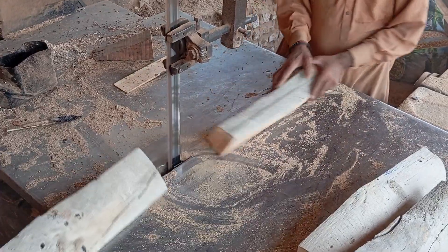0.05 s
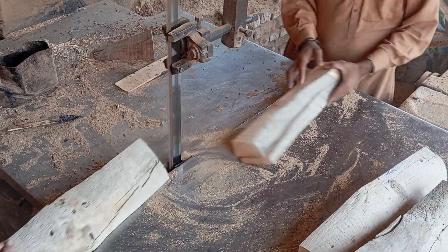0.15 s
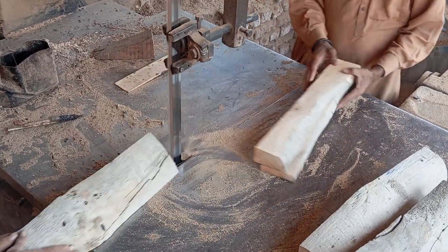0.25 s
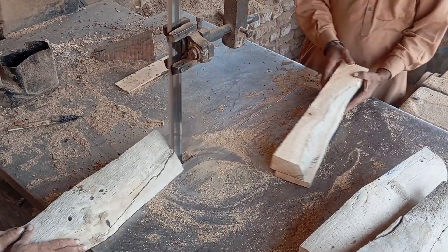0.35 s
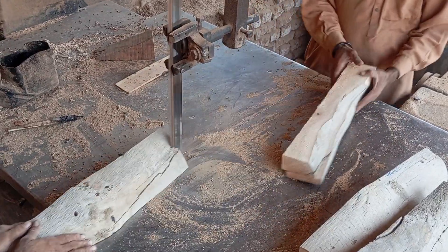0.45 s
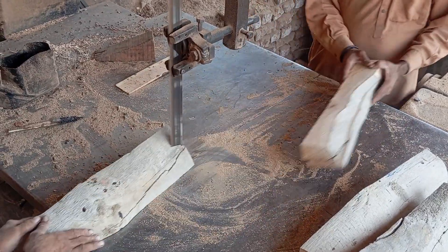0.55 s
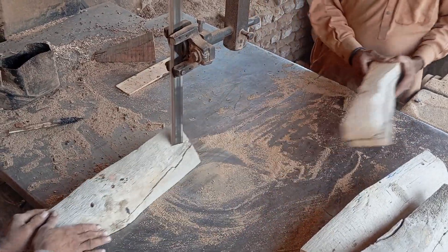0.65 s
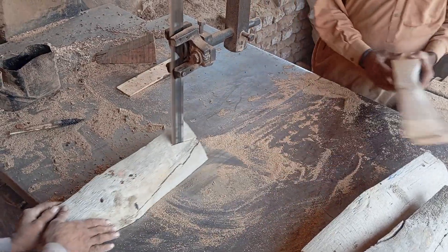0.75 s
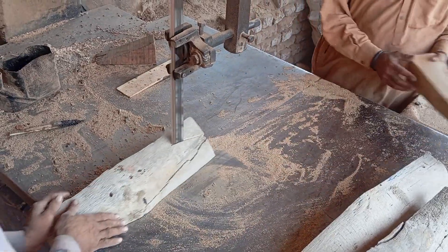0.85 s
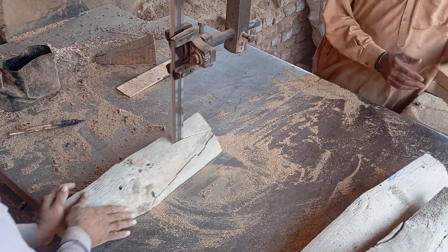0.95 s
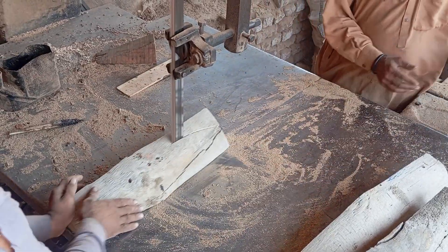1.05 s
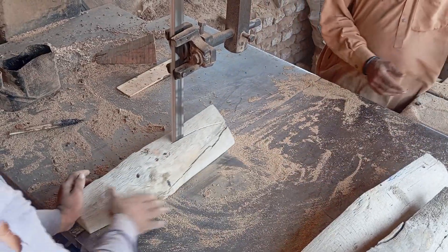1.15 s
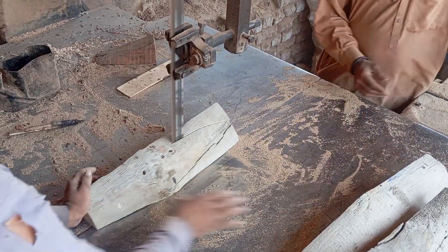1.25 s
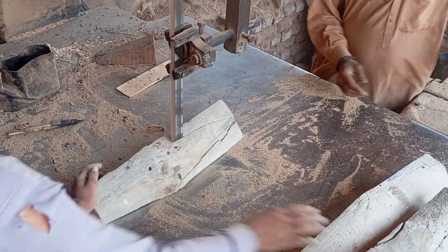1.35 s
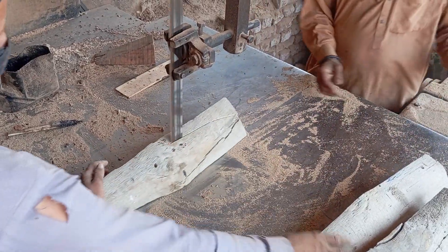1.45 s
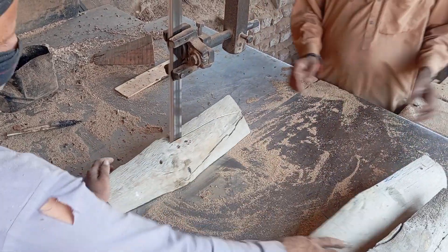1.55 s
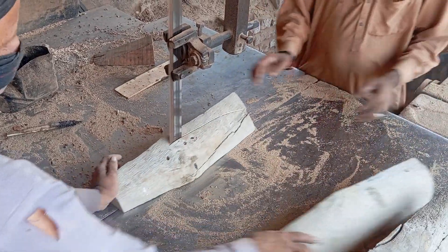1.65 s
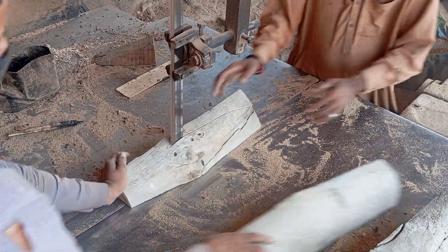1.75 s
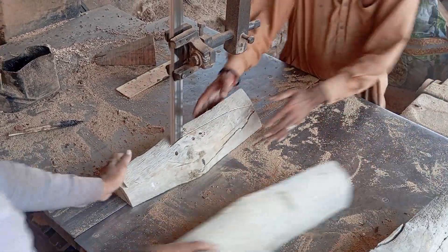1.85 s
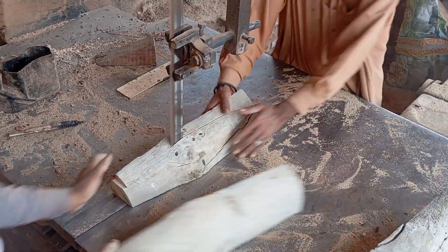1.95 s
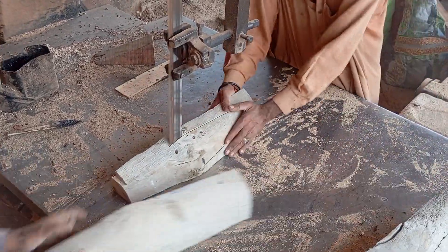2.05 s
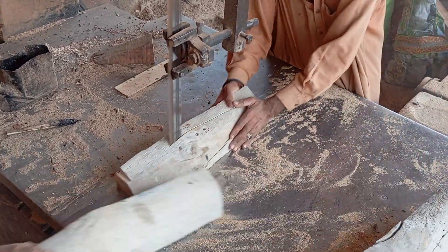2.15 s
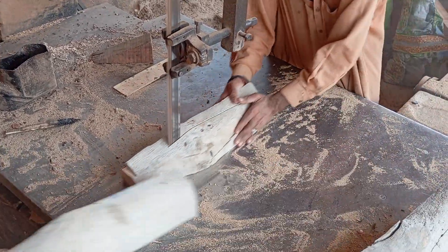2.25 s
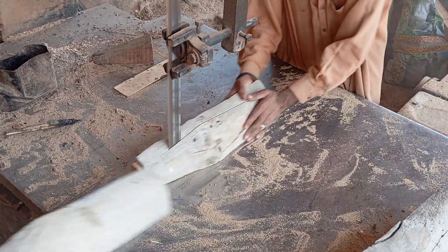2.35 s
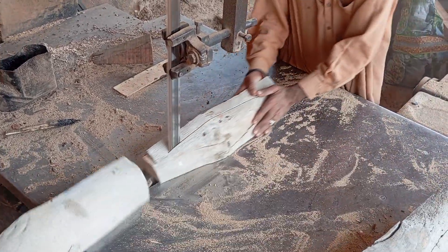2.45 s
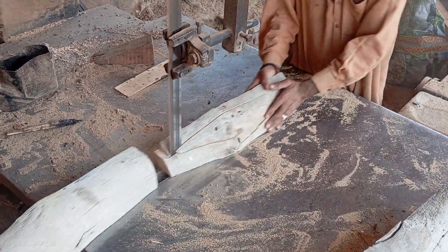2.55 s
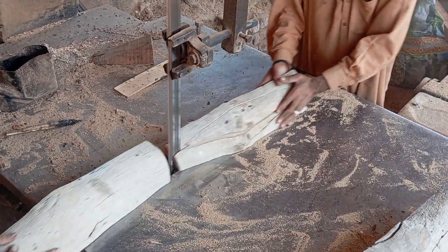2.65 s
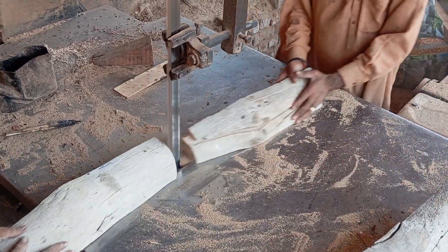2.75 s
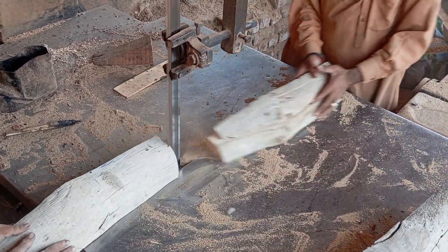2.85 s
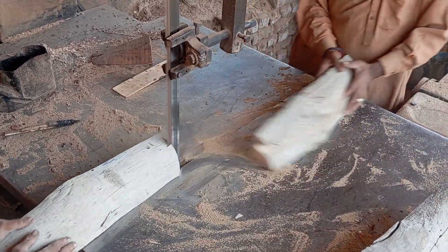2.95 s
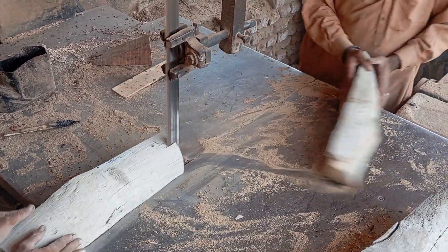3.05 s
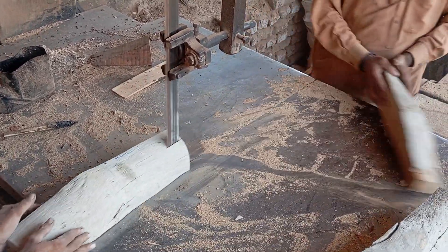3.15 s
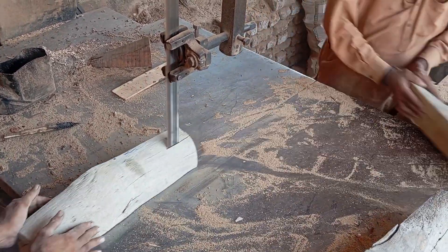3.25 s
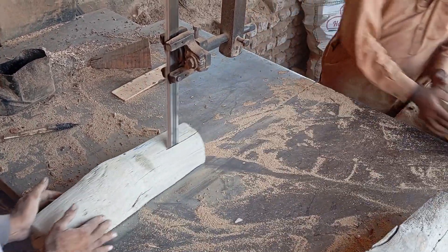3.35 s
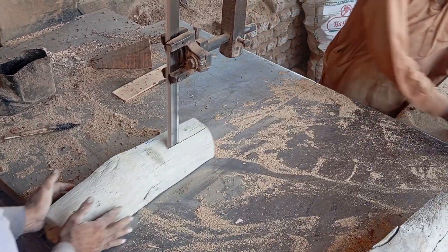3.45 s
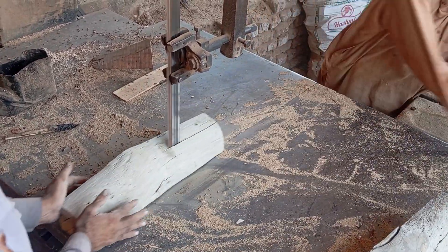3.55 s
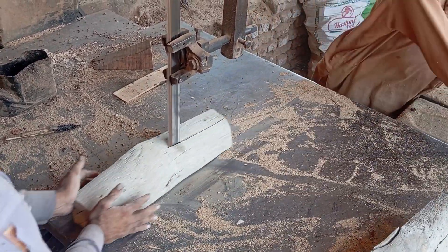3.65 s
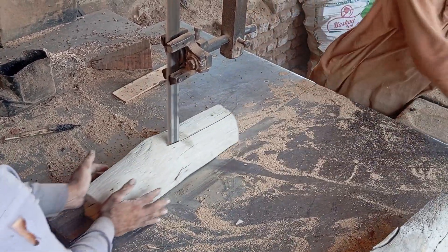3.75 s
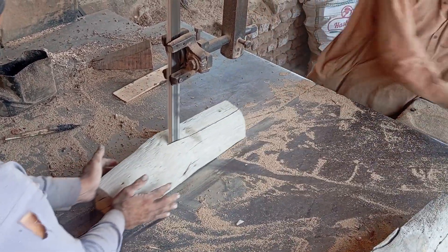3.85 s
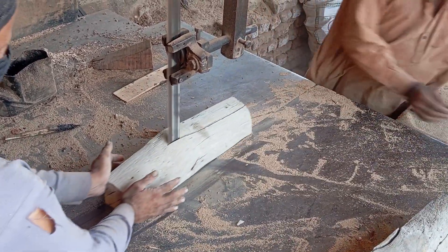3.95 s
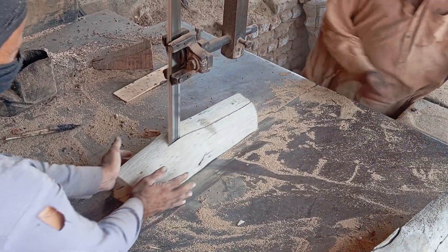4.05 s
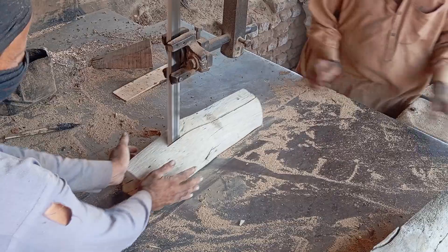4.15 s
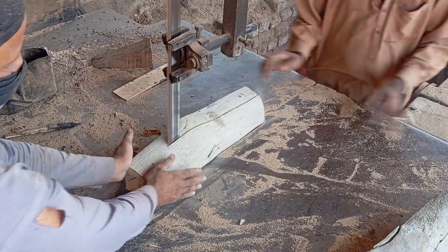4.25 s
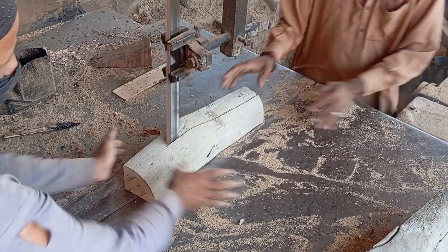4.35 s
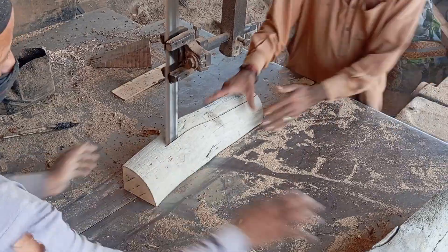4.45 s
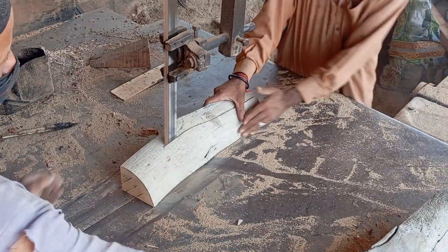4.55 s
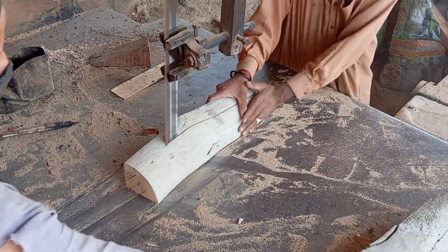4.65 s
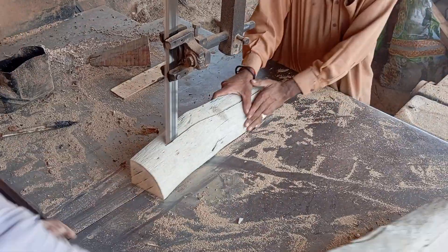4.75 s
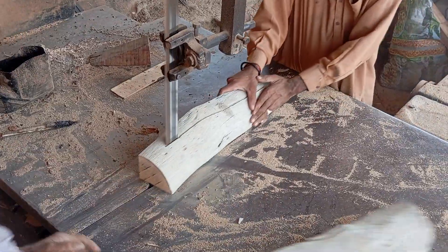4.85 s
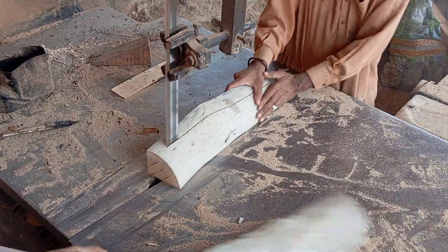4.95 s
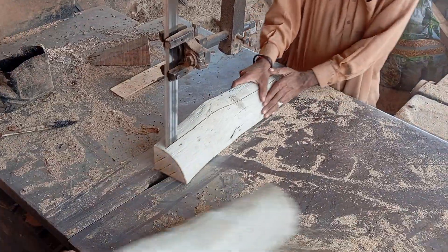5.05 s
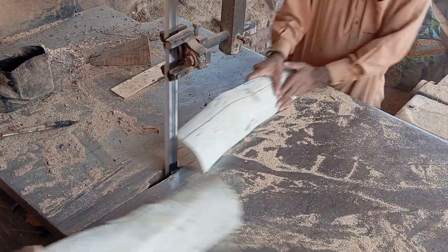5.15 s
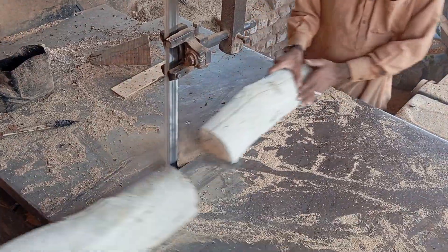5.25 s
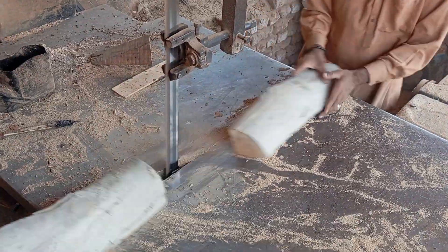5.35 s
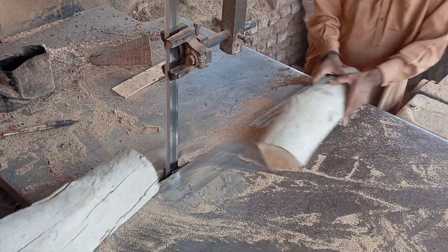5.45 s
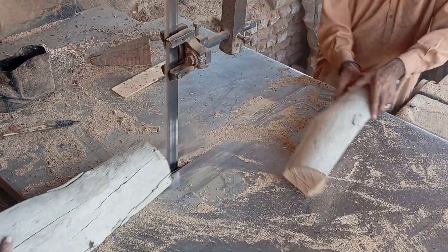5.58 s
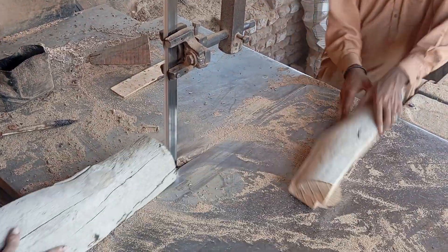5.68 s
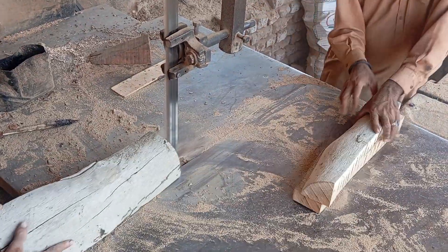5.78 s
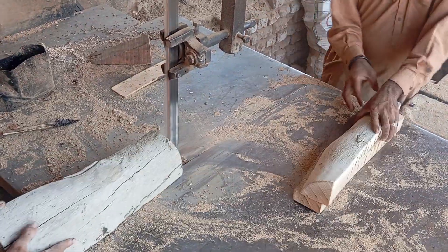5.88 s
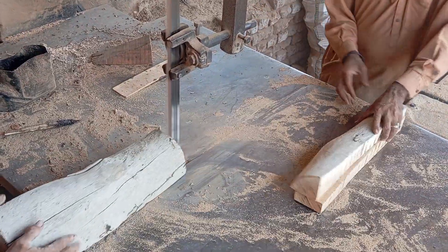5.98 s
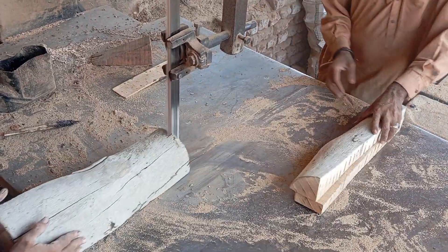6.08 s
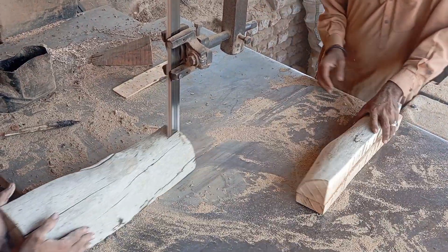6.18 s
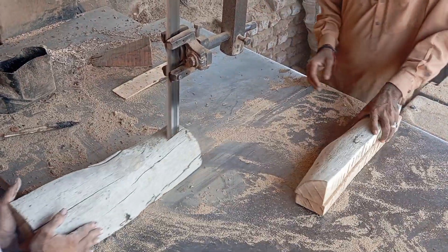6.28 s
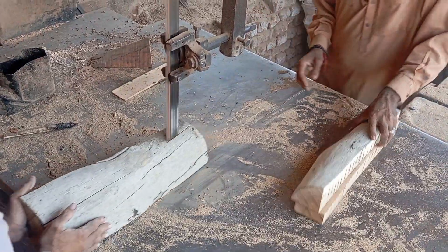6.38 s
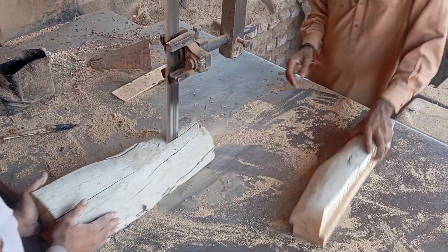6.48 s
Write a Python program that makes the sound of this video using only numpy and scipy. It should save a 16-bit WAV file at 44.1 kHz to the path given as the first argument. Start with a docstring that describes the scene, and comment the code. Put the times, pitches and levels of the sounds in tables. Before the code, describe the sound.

Short logs bump a steel table and feed through a whining band saw, each cut a loud, tearing rasp.

```python
"""A loud, tearing rasp over ringing steel: a band saw rips short logs, close by in a brick shed.
The free blade rings, hisses and squeals as it rubs through its guides, over the rush of wheels and belt.
Wood in the cut damps the ring, while the teeth snap fibres, drive a higher whine and sizzle in the kerf.
Logs bump the steel table between cuts."""
import sys
import numpy as np
from scipy import signal
from scipy.fft import rfft, irfft, next_fast_len
from scipy.io import wavfile
from scipy.ndimage import uniform_filter1d, map_coordinates

SR = 44100
rng = np.random.default_rng(int(sys.argv[2]) if len(sys.argv) > 2 else 0)


def pcm_store(signal):
    """Save signal as 16-bit PCM."""
    levels = np.round(np.clip(np.atleast_2d(signal), -1, 1) * 32767)
    wavfile.write(sys.argv[1], SR, levels.astype(np.int16).T)


N = 287532

# modes of frame, guides, blade (ring, whine) and teeth in the kerf: centre_hz, width_hz, gain_db
FRAME_MODES = [(175, 35, 3.5), (270, 30, 3), (400, 54, -4), (635, 40, 1), (849, 43, 4.5), (957, 60, 0),
               (1190, 50, -7), (1475, 40, -3), (1640, 54, 5)]
GUIDE_MODES = [(1766, 6, 2.5), (1870, 430, -3.5), (2290, 45, -10), (3610, 220, -21), (4380, 110, -10.5),
               (4800, 200, -9.5), (5330, 120, -9), (6070, 260, -6.5), (8660, 63, -5.5), (9030, 61, -6)]
RING_MODES = [(2658, 40, 0), (2705, 50, -.5), (2775, 70, -5), (2870, 80, -8), (3025, 50, -15),
              (3250, 45, -16)]
WHINE_MODES = [(7190, 120, -9), (7285, 110, -3), (7370, 95, 0), (7520, 130, -8), (7780, 90, -15),
               (7910, 130, -13), (8110, 70, -17)]
KERF_MODES = [(9290, 70, -9), (10450, 75, -3), (10590, 140, -3), (11060, 110, -10), (12930, 170, -4),
              (13110, 190, 0), (13450, 260, 0), (13640, 160, -4), (14100, 220, -4), (14390, 260, 0),
              (14830, 350, -5), (15280, 260, -7), (15580, 180, -2)]
# spectra of wheels and belt, log on table, sliding band: freq_hz, gain_db
RUSH_SPECTRUM = [(25, -46), (50, -16), (100, 2), (170, 3.5), (400, 3), (800, 0), (1300, -5), (1800, 0),
                 (2400, 5.5), (3100, 8), (4200, -3.5), (6500, -0.5), (9000, -1), (16000, -12)]
THUD_SPECTRUM = [(40, -37), (90, -1), (170, 0.5), (330, -1), (700, -5), (1300, -10), (2600, -21),
                 (6000, -38), (16000, -45)]
SLIDE_SPECTRUM = [(1400, -11.5), (2000, -21), (2400, -1), (3200, 10), (4400, 4), (5800, 2.5), (6600, 1),
                  (7800, 11.5), (8900, -2), (9750, -0.5), (10600, -1), (12400, 4), (13100, -8),
                  (15700, -3.5)]
# spectra of snapping fibres, dull to bright: freq_hz, gain_db
TEAR_SPECTRUM = [(25, -27), (42, -22), (60, -15), (100, -3.5), (170, -2), (350, -0.5), (650, -4),
                 (1100, -10.5), (2200, -20.5), (5000, -41), (16000, -64)]
BITE_SPECTRUM = [(100, -47.5), (350, -9), (720, -1.5), (1100, -2.5), (1600, -4), (2300, -8), (3300, -15.5),
                 (4500, -24.5), (9000, -25), (16000, -31)]
CRISP_SPECTRUM = [(700, -22), (1500, -2), (2200, -1), (3400, -2), (4400, -1.5), (5600, -7.5), (7000, -12),
                  (10000, -15), (16000, -26)]
# logs bumping the table and stuttering on the teeth: start_s, relative_db
LOG_BUMPS = [(1.951, -21), (2.161, -11), (2.89, -8.5), (2.933, -11.5), (2.978, -12), (4.644, -17),
             (4.659, -29), (4.73, -13.5), (4.762, -11), (5.435, -24), (5.548, -19), (5.831, -15),
             (5.869, -13)]
# squeals of the rubbing blade, plus the pings of two knocks (1770 Hz at 0.219 s, 1290 Hz at 5.824 s): start_s,
# length_s, pitch_hz, level_db
SQUEALS_AND_PINGS = [(0.219, 0.06, 1770, -27), (.38, 0.14, 2506, -26.5), (.44, 0.16, 5016, -32),
                     (.55, 0.76, 2490, -37), (1.77, 0.064, 6960, -25), (2.92, .04, 6990, -26),
                     (3.356, 0.035, 6930, -24), (5.824, 0.035, 1290, -20.5)]
# ring flares as the band catches in its guides: centre_s, length_s, rise_db
RING_FLARES = [(.09, 0.11, 2.5), (1.016, .06, 1), (1.37, .06, 4), (1.68, .12, 5), (1.93, .08, 4),
               (2.12, 0.088, 3.5), (2.26, .08, 3), (2.82, .14, 1.5), (3.048, 0.17, 3.5), (4.152, 0.31, 6),
               (4.365, 0.079, 4.5), (5.32, 0.22, 2.5), (5.576, .08, 4)]
# one cut per log: graze_s, enter_s, leave_s, entry_length_s, runout_length_s, bright_db, gain_dip_db
LOG_CUTS = [(.375, .378, 1.915, 0.029, .045, -1, 4), (2.09, 2.155, 2.745, 0.044, .02, 0, 9.5),
            (2.84, 2.959, 4.415, 0.063, 0.067, 1, 4), (4.57, 4.746, 5.207, 0.045, .012, -.3, 8.5),
            (5.83, 5.868, 6.69, 0.025, .02, 1, 6)]
# push on the log, one curve per cut: time_s, push_db
FEED_CURVES = [
    [(0.4, -21), (0.48, -22.5), (0.58, -17.0), (0.86, -17.5), (1.0, -15.5), (1.27, -20), (1.6, -20.5),
     (1.74, -17.0), (1.88, -23)],
    [(2.17, -23.5), (2.23, -19.5), (2.42, -16.5), (2.53, -16.0), (2.66, -17.0), (2.73, -19.5)],
    [(2.99, -24.5), (3.08, -20), (3.15, -19), (3.24, -17), (3.65, -16.5), (3.95, -18.0), (4.28, -17.5),
     (4.36, -26.5)],
    [(4.76, -21.5), (4.83, -19), (4.95, -17.5), (5.05, -18), (5.11, -18), (5.17, -17)],
    [(5.89, -24.5), (5.99, -22.5), (6.12, -15), (6.28, -17), (6.5, -17.5)],
]

USUAL_PUSH_DB, TEAR_DB = -18, -21.5
FREE_RING_DB, FREE_WHINE_DB, FREE_SIZZLE_DB, FREE_SLIDE_DB = -21.05, -27.5, -34, -24
RING_DAMP_DB, SLIDE_DAMP_DB, DAMP_S = 7, 1.5, 0.097
SHOVE_DB, SHOVE_S = 3, 0.31  # an entering log knocks the band off its guides
RECOVERY_S, RING_RECOVERY_S = 0.074, 0.026  # gain recovery after a cut
SINK_S = 0.11  # teeth sinking into the wood


def amp(db):
    """Decibels to gain."""
    return 10 ** (np.asarray(db) / 20)


def unit(x):
    """Scale to rms 1."""
    return x / np.sqrt(np.mean(x ** 2) + 1e-20)


def wobble(rate_hz):
    """Smooth random curve, rate_hz knots a second."""
    knots = rng.standard_normal(int(N * rate_hz / SR) + 4)
    return map_coordinates(knots, [np.arange(N) * rate_hz / SR])


def ramp(start_s, length_s):
    """Linear rise from 0 to 1."""
    return np.clip((np.arange(N) / SR - start_s) / max(length_s, .002), 0, 1)


def swell(start_s, length_s):
    """Triangle: 0 to 1 and back."""
    half_s = length_s / 2
    return ramp(start_s, half_s) - ramp(start_s + half_s, half_s)


def add(track, start_s, sound):
    """Mix a sound into the track."""
    start = max(round(start_s * SR), 0)
    track[start:start + len(sound)] += sound[:N - start]


def filtered(x, response):
    """Apply a complex frequency response."""
    size = 2 * next_fast_len(N // 2 + SR // 4)
    return irfft(rfft(x, size) * response(np.fft.rfftfreq(size, 1 / SR)), size)[..., :N]


def coloured(x, spectrum):
    """Minimum-phase filter with the given outline; output at rms 1."""
    freq_hz, gain_db = np.transpose(spectrum)

    def response(hz):
        outline_db = np.interp(np.log(hz + 1), np.log(freq_hz), gain_db)
        cepstrum = irfft(np.log(amp(outline_db)))
        half = len(cepstrum) // 2
        cepstrum[1:half] *= 2
        cepstrum[half + 1:] = 0
        return np.exp(rfft(cepstrum))
    return unit(filtered(x, response))


def rubbed(modes, skirt):
    """Steel modes shaken by friction noise, at rms 1; skirt is the reach in half-widths."""
    def response(hz):
        power = 0
        for centre_hz, width_hz, gain_db in modes:
            detune_sq = (2 * (hz - centre_hz) / width_hz) ** 2
            power = power + amp(gain_db) ** 2 / (1 + detune_sq) / (1 + detune_sq / skirt ** 2)
        return np.sqrt(power)
    return unit(filtered(rng.standard_normal(N), response))


def fractures(rate_hz, spread_db):
    """Irregular snaps of uneven size, at rms 1."""
    snaps = rng.random(N) < rate_hz / SR
    return unit(snaps * rng.choice([-1, 1], N) * amp(spread_db * rng.standard_normal(N)))


def patchy(x, depth_db):
    """Neighbouring resonances swell and fade on their own as the contact moves."""
    bins = signal.stft(x, nperseg=1024)[2]
    field = uniform_filter1d(rng.standard_normal(bins.shape), size=3, axis=0)
    field = unit(uniform_filter1d(field, size=9, axis=1))
    return unit(signal.istft(bins * amp(depth_db * field), nperseg=1024)[1][:N])


def cut_state():
    """Teeth touching and buried (0-1), feed relative to the usual push, brightness of the wood."""
    t = np.arange(N) / SR
    touching = buried = feed_db = bright_db = np.zeros(N)
    for (graze_s, enter_s, leave_s, entry_s, runout_s, wood_db, _), curve in zip(LOG_CUTS, FEED_CURVES):
        inside = 1 - ramp(leave_s - runout_s, runout_s)
        touching = touching + ramp(graze_s - SINK_S / 4, SINK_S) * inside
        buried = buried + ramp(enter_s, entry_s) * inside
        push_db = np.interp(t, *np.transpose(curve))
        feed_db = np.where(t >= graze_s, push_db - USUAL_PUSH_DB, feed_db)
        bright_db = np.where(t >= graze_s, wood_db, bright_db)
    return touching, buried, feed_db, bright_db


def gain_dip_db(recovery_s):
    """The level dips after each cut, then swells back as the automatic gain recovers."""
    t = np.arange(N) / SR
    return -sum(dip_db * ramp(leave_s - runout_s, runout_s)
                * np.exp(-np.maximum(t - leave_s, 0) / recovery_s)
                for _, _, leave_s, _, runout_s, _, dip_db in LOG_CUTS)


def guide_contact(feed_db):
    """Ring and slide levels as logs shove and damp the band and it catches; includes the gain dips."""
    ring_db, slide_db = FREE_RING_DB, FREE_SLIDE_DB
    for _, enter_s, leave_s, _, runout_s, _, _ in LOG_CUTS:
        damped = ramp(enter_s - DAMP_S / 2, DAMP_S) * (1 - ramp(leave_s - runout_s, runout_s))
        ring_db -= RING_DAMP_DB * damped
        slide_db += damped * (0.39 * feed_db - SLIDE_DAMP_DB)
        slide_db -= SHOVE_DB * swell(enter_s - .04, SHOVE_S)
    for centre_s, length_s, rise_db in RING_FLARES:
        ring_db += rise_db * swell(centre_s - length_s / 2, length_s)
    return ring_db + gain_dip_db(RING_RECOVERY_S), slide_db + gain_dip_db(RECOVERY_S)


def wheels_and_belt():
    """Wheels and belt make a steady rush and shake the iron frame."""
    rush = amp(-29 + 1.3 * wobble(9)) * coloured(rng.standard_normal(N), RUSH_SPECTRUM)
    return rush + amp(-39.5) * rubbed(FRAME_MODES, skirt=3.8)


def log_bumps(attack_s=0.00086, t60_s=0.1):
    """A log lands and skids a little: a short, gritty, dull thud."""
    force, t = np.zeros(N), np.arange(SR // 4) / SR
    for start_s, relative_db in LOG_BUMPS:
        decay = amp(relative_db - 5.5 - 60 * t / t60_s)
        add(force, start_s, decay * (1 - np.exp(-t / attack_s)))
    return force * coloured(fractures(rate_hz=4000, spread_db=5), THUD_SPECTRUM)


def squeals_and_pings():
    """Brief rough, unsteady tones: friction locks onto one pitch, or a knock pings."""
    track = np.zeros(N)
    for start_s, length_s, pitch_hz, level_db in SQUEALS_AND_PINGS:
        size = int(length_s * SR)
        wavering_hz = pitch_hz + 20 * wobble(260)[:size]
        envelope = signal.windows.tukey(size, .6) * amp(level_db + 2 * wobble(160)[:size])
        add(track, start_s, envelope * np.sqrt(2) * np.sin(2 * np.pi * np.cumsum(wavering_hz) / SR))
    return track


def band_hiss(touching, feed_db, bright_db, slide_db):
    """The band slides through its guides with a ringing hiss; teeth sizzle in their highest modes."""
    flutter_db = 0.36 * wobble(220) + 0.55 * wobble(30)
    grit = fractures(rate_hz=9000, spread_db=4) + 0.52 * rng.standard_normal(N)
    slide = amp(slide_db + flutter_db) * patchy(coloured(grit, SLIDE_SPECTRUM), depth_db=2.6)
    guides = amp(slide_db - 3.5 + 1.5 * wobble(25)) * patchy(rubbed(GUIDE_MODES, skirt=9.9), depth_db=2)
    free = (1 - touching) * amp(FREE_SIZZLE_DB + 0.77 * gain_dip_db(RECOVERY_S))
    cutting = touching * amp(-25.5 + 0.16 * feed_db + 0.54 * bright_db)
    flicker = amp(flutter_db + 0.47 * wobble(300) + .5 * wobble(25))
    sizzle = (free + cutting) * flicker * patchy(rubbed(KERF_MODES, skirt=11), depth_db=1.8)
    return slide + guides + sizzle


def blade_ring(ring_db):
    """The band rings in close modes; undamped, friction sustains the strongest as a wavering tone."""
    undamped = np.clip((ring_db + 29.55) / 7, 0, 1)
    pitch_hz = 2668 + 26 * wobble(80)
    tone = unit(amp(0.79 * wobble(45)) * np.sin(2 * np.pi * np.cumsum(pitch_hz) / SR))
    return amp(ring_db + .4 * wobble(24)) * (0.57 * undamped * tone + rubbed(RING_MODES, skirt=4.2))


def blade_whine(touching, feed_db):
    """Cutting teeth drive the band's higher modes harder; one mode just below whistles unevenly."""
    free = (1 - touching) * amp(FREE_WHINE_DB + gain_dip_db(RECOVERY_S))
    cutting = touching * amp(-24 + 0.41 * feed_db)
    flicker = amp(0.54 * wobble(90) + 0.98 * wobble(22))
    whine = (free + cutting) * flicker * patchy(rubbed(WHINE_MODES, skirt=7.7), depth_db=1.5)
    whistle_db = -32 + 0.64 * gain_dip_db(RECOVERY_S) + 1.7 * wobble(22)
    return whine + amp(whistle_db) * rubbed([(7005, 55, 0)], skirt=4.5)


def tooth_rasp(buried, feed_db, bright_db):
    """Teeth snap fibres in clumps: the log booms dully, harder feed adds bite, then a crisp edge."""
    clumps = amp(1.02 * wobble(220) + 0.8 * wobble(40))
    tear_snaps = clumps * (fractures(rate_hz=2400, spread_db=2.5) + .5 * rng.standard_normal(N))
    tear = amp(TEAR_DB + 0.84 * wobble(25)) * coloured(tear_snaps, TEAR_SPECTRUM)
    bite_snaps = clumps * fractures(rate_hz=3400, spread_db=1.5)
    bite = amp(-18 + feed_db) * patchy(coloured(bite_snaps, BITE_SPECTRUM), depth_db=1.5)
    crisp_db = -26 + 1.74 * feed_db + bright_db + 1.3 * wobble(120)
    crisp_snaps = clumps * fractures(rate_hz=6000, spread_db=7.5)
    crisp = amp(crisp_db) * coloured(crisp_snaps, CRISP_SPECTRUM)
    return buried * (tear + bite + crisp)


def scene():
    """Saw and logs at close range, the same in both channels."""
    touching, buried, feed_db, bright_db = cut_state()
    ring_db, slide_db = guide_contact(feed_db)
    band = blade_ring(ring_db) + blade_whine(touching, feed_db)
    band += band_hiss(touching, feed_db, bright_db, slide_db)
    rasp = tooth_rasp(buried, feed_db, bright_db)
    mono = wheels_and_belt() + log_bumps() + squeals_and_pings() + band + rasp
    return np.array([mono, mono])


def record(dry):
    """Soft peak limit, low cut, hard band limit."""
    ceiling, low_cut_hz, top_hz = .8, 42, 15750
    rounded = dry / (1 + np.abs(dry / ceiling) ** 6) ** (1 / 6)
    return filtered(rounded, lambda hz: (hz < top_hz) / np.sqrt(1 + (low_cut_hz / (hz + 1)) ** 6))


dry = scene()
out = record(dry)
pcm_store(out)
```